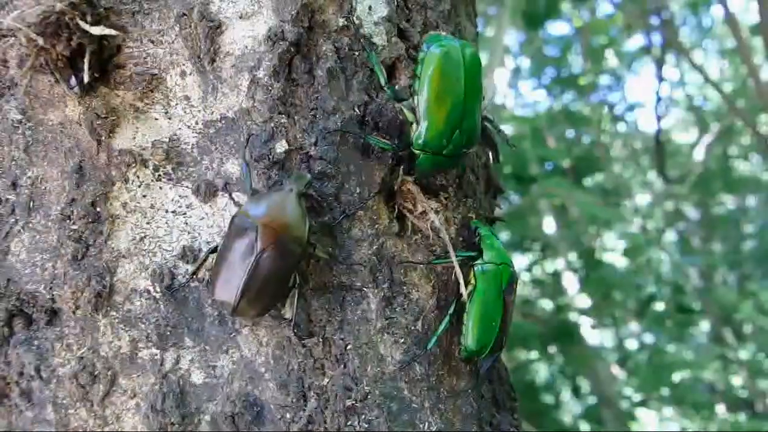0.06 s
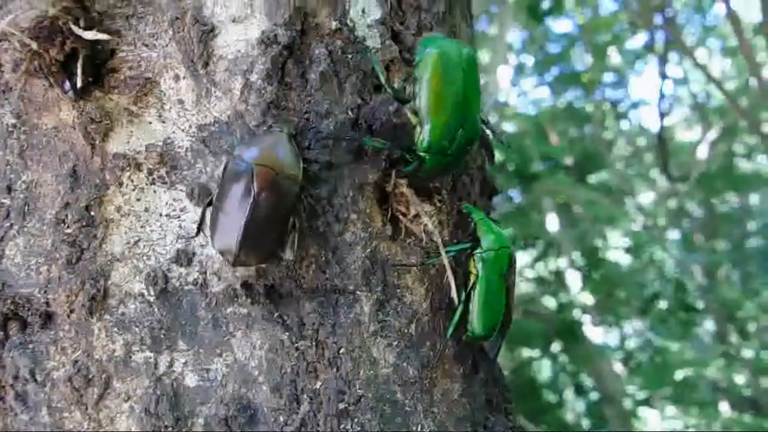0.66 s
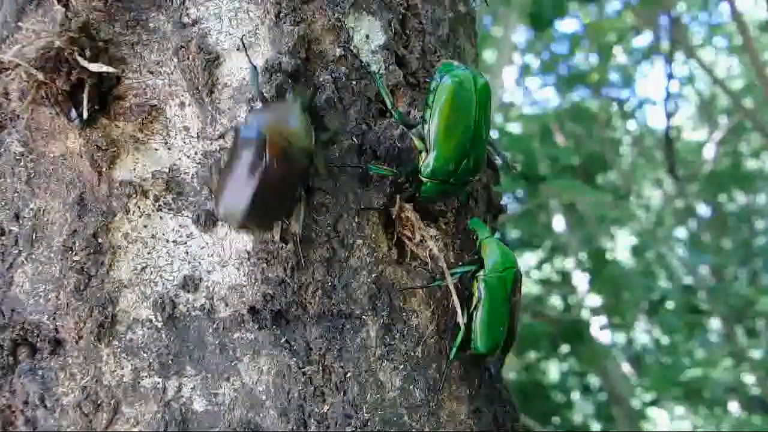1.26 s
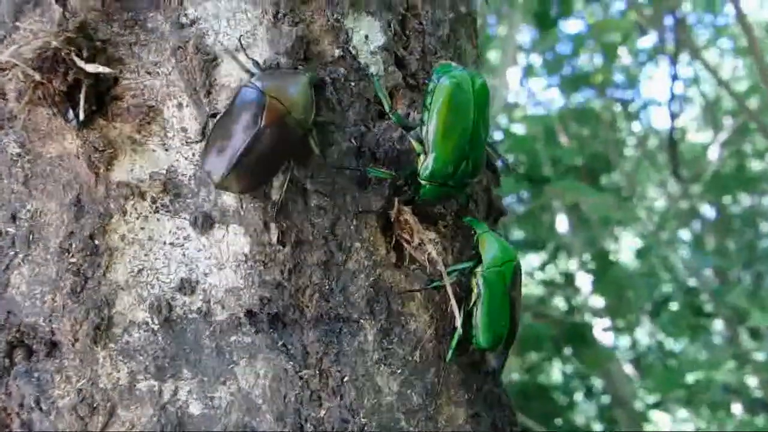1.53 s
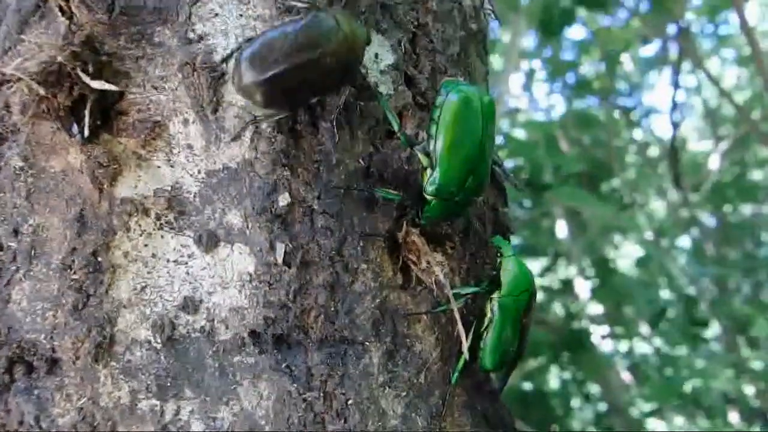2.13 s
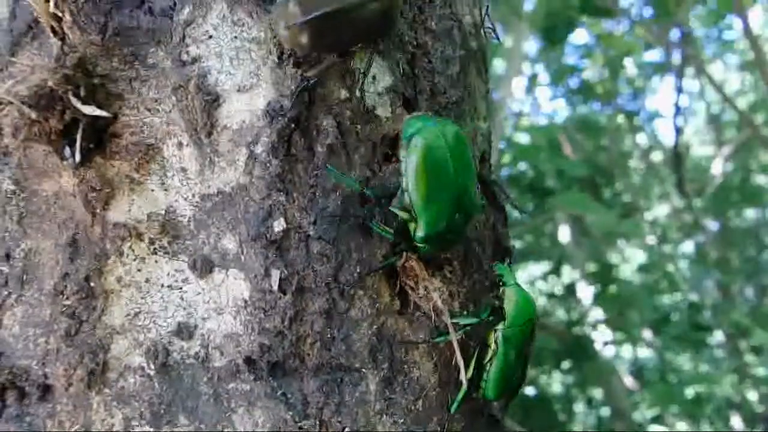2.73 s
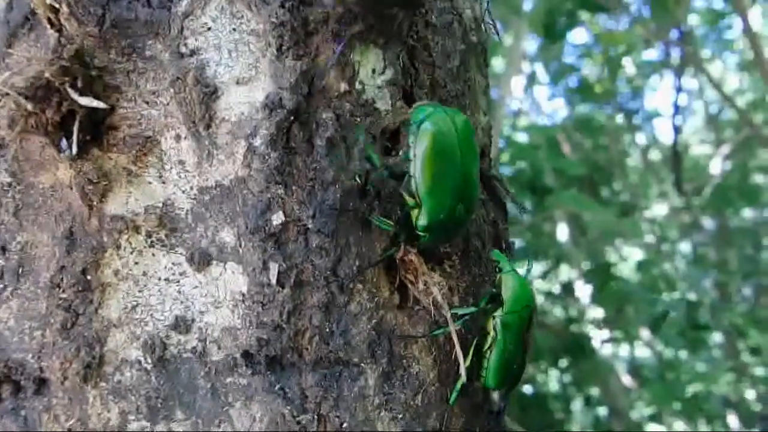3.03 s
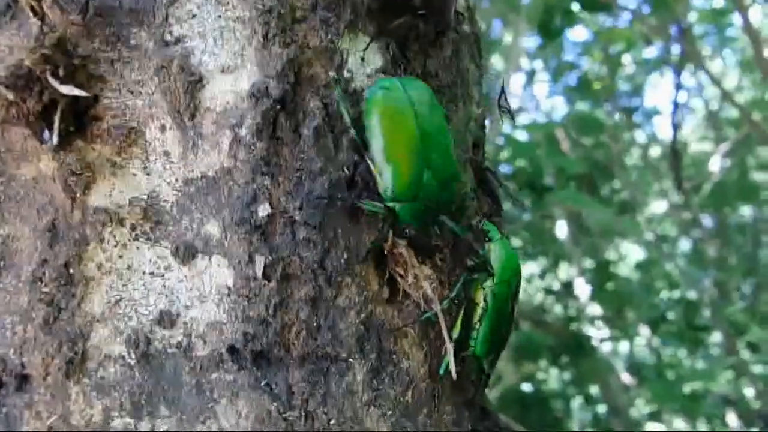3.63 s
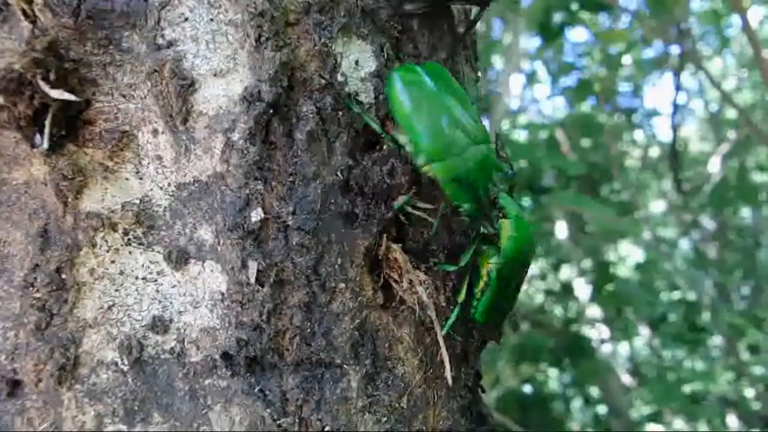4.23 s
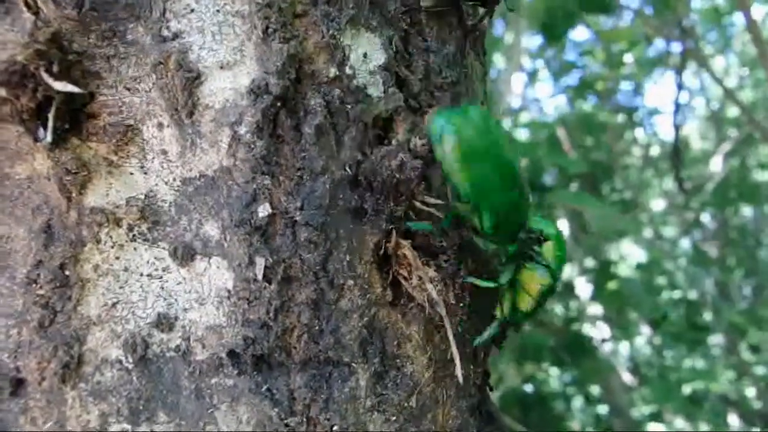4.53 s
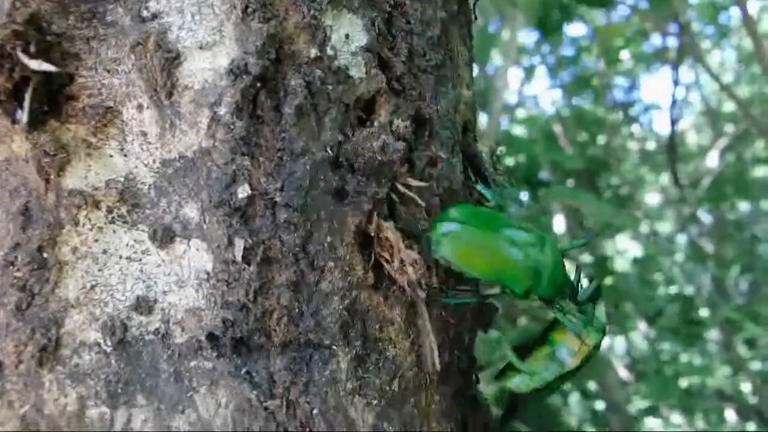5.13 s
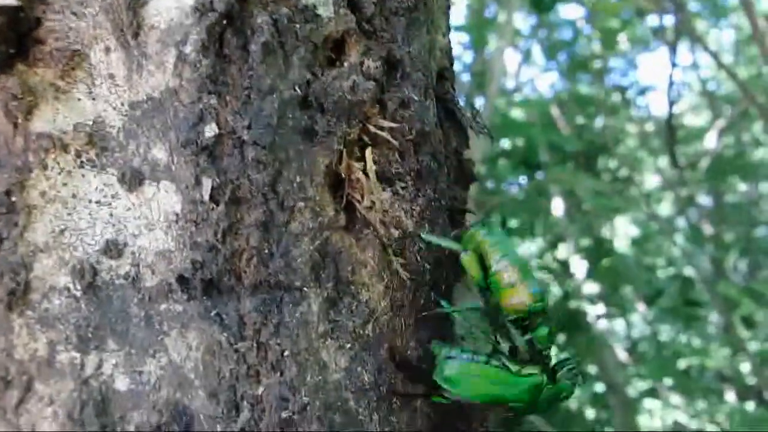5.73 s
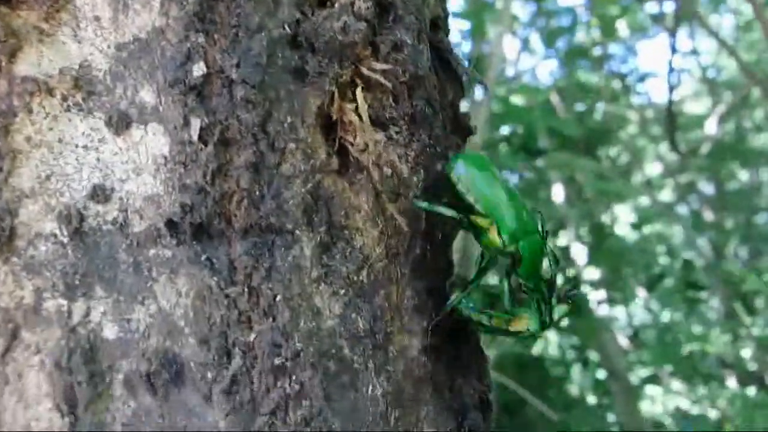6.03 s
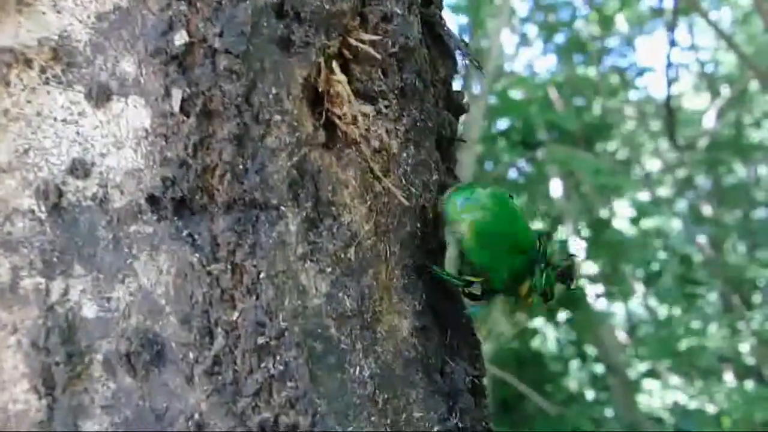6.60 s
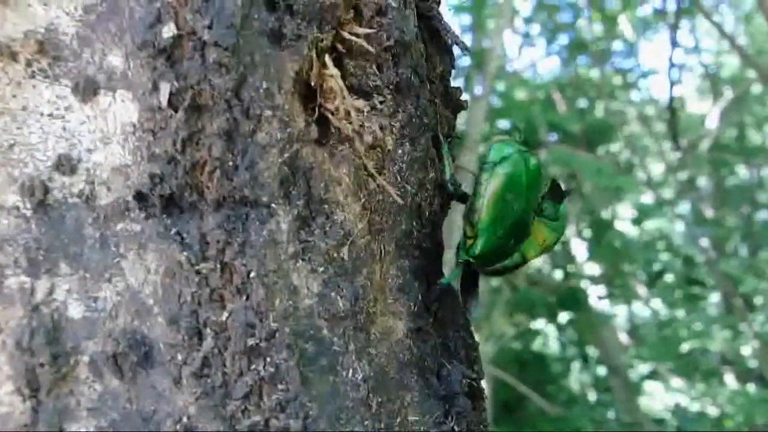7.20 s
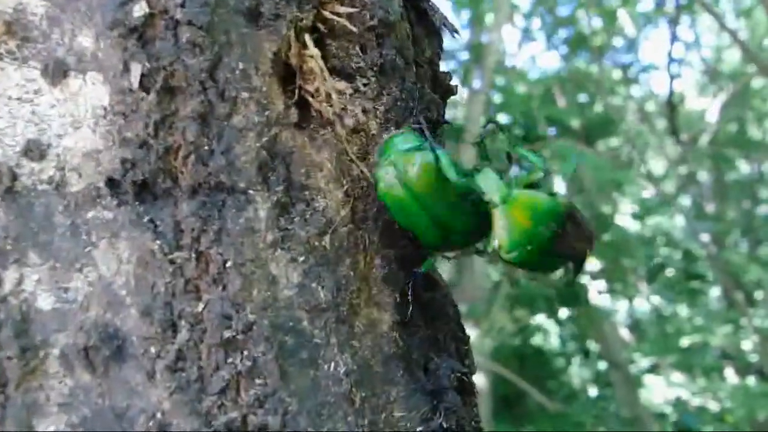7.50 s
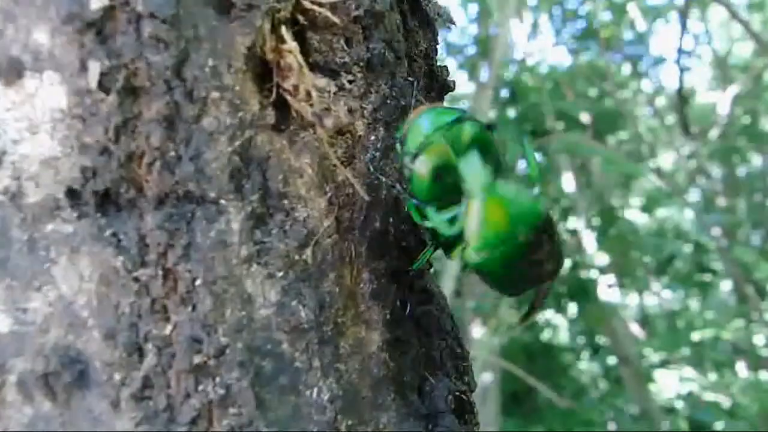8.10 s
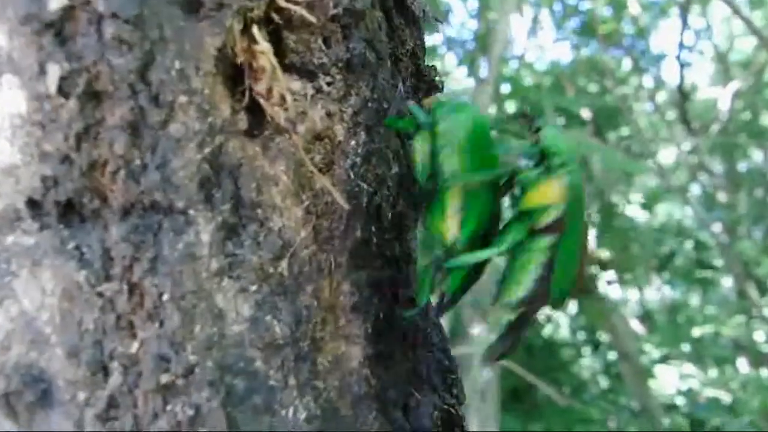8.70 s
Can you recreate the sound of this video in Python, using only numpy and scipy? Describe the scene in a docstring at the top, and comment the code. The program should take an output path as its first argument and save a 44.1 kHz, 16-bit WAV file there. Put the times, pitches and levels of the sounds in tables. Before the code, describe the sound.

Light wind tumbles over the microphone in a forest, making a low rumble with soft, uneven puffs. Close by, beetles on a tree trunk give a couple of tiny ticks, then from about halfway begin to wrestle, their claws clicking, scraping and slipping on the bark. A thin hiss and a faint, high insect chorus continue behind, and a distant bird whistles faintly three times as the scuffle starts.

```python
"""On a tree trunk in a forest, beetles climb and wrestle close to a camera.
Their claws tick as they snap free of the bark and scrape as they stick and slip over it.
Light wind tumbles over the microphone, and its swirls of air make low, soft puffs.
Behind are a thin hiss, a chorus of insects, a faint whistling bird and the camera's tiny whine."""
import sys
import numpy as np
from scipy import signal
from scipy.fft import rfft, irfft, next_fast_len
from scipy.io import wavfile
from scipy.ndimage import uniform_filter1d, map_coordinates

SR = 44100
rng = np.random.default_rng(int(sys.argv[2]) if len(sys.argv) > 2 else 0)


def generate_wav(sig):
    """Save sig (samples, or channels by samples) to the path in sys.argv[1] as 16-bit PCM at SR."""
    pcm = np.round(np.clip(np.atleast_2d(sig).T, -1, 1) * 32767).astype(np.int16)
    wavfile.write(sys.argv[1], SR, pcm)


N = 385875

# Levels in these tables are relative: the functions add their own gains.
# The loudest claw snaps and shell knocks. Each row: start in seconds, crack in dB, bark ring in dB.
CLAW_SNAPS = [(2.2214, -40, -62), (2.4664, -38, -60), (3.9804, -44, -48), (4.0651, -33, -46.5),
              (4.1916, -37, -47.5), (4.4814, -29.5, -41.5), (4.513, -33, -46), (4.5654, -42, -46),
              (4.5798, -47, -43.5), (4.6216, -47, -50), (4.6468, -48, -48), (4.8489, -34, -54),
              (4.896, -31.5, -43), (5.1533, -30, -57), (5.1647, -28.5, -54), (5.216, -21, -55),
              (5.2374, -36, -45.5), (5.4648, -36, -51), (6.346, -41, -45), (6.4364, -30, -52),
              (6.4508, -29, -41.5), (6.4988, -28.5, -61), (6.5567, -26.5, -45.5), (6.9323, -34.5, -62),
              (7.0105, -35.5, -66), (7.5314, -29, -58), (7.5567, -31, -59), (7.6237, -23, -46),
              (7.6915, -33, -41.5), (7.7149, -45, -43.5), (8.042, -46, -48.5), (8.3584, -33.5, -43),
              (8.469, -30, -54), (8.4869, -32, -35.5), (8.6927, -38, -44)]
# Legs dragged over bark. Each row: start and length in seconds, fine scratch in dB, crunch in dB.
LEG_DRAGS = [(3.98, 0.27, -68, -67), (4.416, 0.24, -58.5, -59.5), (4.858, 0.055, -51, -54.5),
             (4.99, 0.03, -53, -59), (5.477, 0.035, -59, -69), (5.693, 0.018, -54, -65),
             (5.915, 0.02, -53, -67), (5.985, 0.053, -56, -58.5), (6.14, 0.26, -59.5, -64.5),
             (6.255, 0.02, -48, -65), (6.42, 0.016, -47.5, -55), (6.487, 0.063, -52.5, -58.5),
             (6.755, 0.036, -50, -55), (7.13, 0.01, -49, -60), (7.53, 0.039, -52.5, -60),
             (7.99, 0.11, -60, -66), (8.362, 0.0089, -46, -55), (8.469, 0.024, -42, -43),
             (8.499, 0.02, -44, -42.5), (8.58, 0.15, -58, -59.5)]
# The breeze between gusts. Each row: time in seconds, rumble in dB.
BREEZE_LEVELS = [(0.3, -34), (0.9, -38.5), (1.3, -35.5), (2.1, -34.5), (2.8, -36), (3.5, -37.5), (4.0, -38),
                 (4.5, -42.5), (4.8, -33.5), (5.05, -45), (5.2, -39), (5.85, -36.5), (6.25, -44.5),
                 (6.6, -31), (7.0, -42.5), (7.3, -35), (8.75, -34.5)]
# Gusts. Each row: start and length in seconds, rumble in dB, flutter in dB compared with that rumble.
WIND_GUSTS = [(0.281, 0.068, -24, 2.5), (0.376, 0.074, -25.5, -9), (0.575, 0.013, -23.5, -19),
              (0.662, 0.038, -30.5, -21), (0.733, 0.046, -30, -4.5), (1.082, 0.02, -34.5, -5),
              (1.207, 0.06, -32.5, -11), (1.418, 0.04, -30, -10.5), (1.523, 0.038, -16, -8),
              (1.57, 0.062, -23.5, -19), (1.835, 0.12, -33, -10), (2.053, 0.013, -22.5, -15.5),
              (2.356, 0.005, -20, -9), (2.404, 0.068, -26.5, -11.5), (2.965, 0.0098, -33, -5),
              (3.15, 0.66, -42.5, -6), (3.379, 0.033, -25.5, -15), (4.033, 0.058, -33.5, -16.5),
              (4.611, 0.051, -29, -10), (4.7, 0.035, -28, -10), (4.843, 0.046, -32.5, -28),
              (5.17, 0.041, -35.5, -14), (5.424, 0.075, -29.5, -12), (5.533, 0.0075, -26, -6.5),
              (6.377, 0.057, -27, -22), (6.487, 0.03, -37.5, -25), (6.637, 0.05, -22.5, -17),
              (7.063, 0.048, -28.5, -4), (7.147, 0.11, -23.5, -10.5), (7.302, 0.045, -29.5, -15),
              (7.574, 0.09, -26, -13.5), (7.709, 0.082, -21.5, -14.5), (7.818, 0.11, -25, -24),
              (8.024, 0.076, -30.5, -23), (8.181, 0.014, -25, -13), (8.251, 0.16, -26, -8),
              (8.631, 0.047, -28, -10)]
# The strongest swirls of air. Each row: time in seconds, level in dB, pitch in Hz.
AIR_SWIRLS = [(0.313, -13, 264), (0.321, -13.5, 450), (0.331, -16, 597), (0.345, -10.5, 206),
              (0.358, -17, 400), (0.392, -8.5, 190), (0.704, -16.5, 138), (0.752, -14.5, 162),
              (0.977, -23.5, 112), (1.238, -20.5, 182), (1.432, -18.5, 197), (1.533, -12, 142),
              (1.546, -14, 136), (2.357, -10, 255), (2.362, -8, 255), (2.404, -12, 240),
              (2.586, -21.5, 160), (2.968, -25, 243), (4.733, -14.5, 192), (5.544, -14.5, 130),
              (6.389, -15.5, 151), (6.648, -13.5, 170), (6.691, -9.5, 137), (7.073, -10, 142),
              (7.155, -9.5, 194), (7.192, -8.5, 165), (7.242, -11.5, 188), (7.359, -14, 185),
              (7.673, -15, 165), (7.733, -12.5, 180), (7.792, -15, 139), (8.288, -10, 166),
              (8.319, -11, 284), (8.389, -12, 176)]
# The forest background. Each row: time in seconds, hiss in dB, insect chorus in dB.
FOREST_LEVELS = [(.3, -57.5, -65), (1.2, -55, -62.5), (4, -54, -61), (8.75, -54, -61.5)]
# Single insects. Each row: pitch in Hz, pitch waver in Hz, level in dB.
INSECT_VOICES = [(4640, 13, -8), (7130, 25, -14), (7560, 25, -17), (8053, 30, -17), (8440, 40, -6),
                 (8930, 45, -7.5), (9362, 30, -16), (9470, 30, -15), (11580, 50, -17), (13620, 70, -24)]
# The bird's whistles. Each row: start in seconds, level in dB.
BIRD_CALLS = [(4.23, -63), (4.665, -55.5), (5.055, -56)]
# The tone colour of each noise. Each row: frequency in Hz, level in dB.
CLAW_TONE = [(1500, -21), (3000, 3.5), (5000, 5.5), (7000, 5), (9000, 9.5), (11500, 4.5), (15500, 7)]
BARK_TONE = [(500, 7), (1200, -4.5), (2000, 2), (2900, 8.5), (3600, 5), (5000, -6), (8000, -31),
             (12000, -58)]
RUMBLE_TONE = [(15, -21), (30, -10.5), (55, 2.5), (90, 2), (140, -1), (200, -8.5), (280, -17), (400, -49.5),
               (700, -69), (2000, -120)]
FLUTTER_TONE = [(120, -30), (220, -2.5), (300, 3), (400, -5), (490, -10.5), (590, -19), (750, -23.5),
                (1000, -34), (1600, -43), (3000, -120)]
HISS_TONE = [(100, -36), (500, 4), (900, 0), (2000, -1), (2900, -2), (3700, -9), (5500, -8.5), (9000, -26),
             (11000, -12), (16000, -18)]
CHORUS_TONE = [(5500, -55), (6600, -6.5), (7300, -0.5), (8200, 2.5), (9300, 0), (9900, -11), (10800, -37)]
# Narrow treble bands that the camera turns down. Each row: centre in Hz, width in Hz.
CAMERA_NOTCHES = [(4050, 430), (6260, 590), (7810, 690), (10160, 580)]


def claw_ticks(claw_db=-6, bark_db=5, rise_s=0.0008, crack_s=0.009, crumble_s=0.03, crumble_db=-22):
    """A claw snaps free: a bright crack, a duller ring of the bark and a short crumbling tail."""
    claw, bark, t = np.zeros(N), np.zeros(N), np.arange(SR // 16) / SR
    decay = amp(-60 * t / crack_s) + amp(crumble_db - 60 * t / crumble_s)
    shape = (1 - np.exp(-(t / rise_s) ** 2)) * decay
    shape /= shape.max()
    for start, crack_db, ring_db in CLAW_SNAPS:
        add(claw, start, amp(crack_db + claw_db) * shape * rng.standard_normal(len(t)))
        add(bark, start, amp(ring_db + bark_db) * shape * rng.standard_normal(len(t)))
    return coloured(claw, CLAW_TONE) + coloured(bark, BARK_TONE)


def leg_scrapes(level_db=2, scuffle_start_s=3.9, slips_per_s=420, slip_decay_s=0.0015, spread_db=4.5):
    """Dragged claws stick and slip on the bark, making a dense run of tiny, uneven cracks."""
    # Once the wrestling starts, the legs also scrabble lightly between drags.
    scuffle = (np.arange(N) / SR > scuffle_start_s) * amp(3 * wobble(30))
    edges = dict(rise_s=0.004, fall_s=0.011)
    scratch_power = swells([(s, length, db) for s, length, db, _ in LEG_DRAGS], **edges)
    crunch_power = swells([(s, length, db) for s, length, _, db in LEG_DRAGS], **edges)
    slips = (rng.random(N) < slips_per_s / SR) * amp(spread_db * np.clip(rng.standard_normal(N), -2, 2))
    slip_shape = np.exp(-np.arange(SR // 50) / SR / slip_decay_s)
    grain = steadied(signal.fftconvolve(slips, slip_shape)[:N], samples=1400)
    scratch = np.sqrt(scratch_power + (scuffle * amp(-68.5)) ** 2) * noise(CLAW_TONE)
    crunch = np.sqrt(crunch_power + (scuffle * amp(-65.5)) ** 2) * noise(BARK_TONE)
    return amp(level_db) * grain * (scratch + crunch)


def wind(rumble_db=-0.5, gust_db=-1, flutter_db=-3, roll_db=1, lumps_db=6.5, gust_cut_hz=65.4):
    """Air tumbles over the microphone: big swirls rumble, small ones flutter, and gusts add to both."""
    breeze_db, = curves(BREEZE_LEVELS)
    edges = dict(rise_s=0.0051, fall_s=0.015)
    gust_power = swells([(s, length, db) for s, length, db, _ in WIND_GUSTS], **edges)
    flutter_power = swells([(s, length, db + extra) for s, length, db, extra in WIND_GUSTS], **edges)
    flutter_power += amp(breeze_db - 15.5) ** 2  # the breeze flutters a little too
    roll = amp(roll_db * wobble(22))
    lumps = amp(lumps_db * wobble(130))
    rumble = steadied(noise(RUMBLE_TONE) * roll, samples=4400)
    flutter = steadied(noise(FLUTTER_TONE) * roll * lumps, samples=1800)
    # Gusts are too short to carry the deepest rumble.
    gust = filtered(noise(RUMBLE_TONE), lambda hz: hz ** 4 / (hz ** 4 + gust_cut_hz ** 4))
    return (amp(breeze_db + rumble_db) * rumble
            + amp(gust_db) * np.sqrt(gust_power) * steadied(gust, samples=1000)
            + amp(flutter_db) * np.sqrt(flutter_power) * flutter)


def wind_puffs(width_cycles=0.33, edge_db=-12, edge_ratio=1.6, low_hz=65, high_hz=720):
    """A strong swirl is one short swing of pressure; it sheds a smaller, higher one that sharpens it."""
    puffs, t = np.zeros(N), np.arange(-SR // 25, SR // 25) / SR

    def swing(hz):
        wave = np.sin(2 * np.pi * hz * t + rng.uniform(0, 2 * np.pi))
        return wave / np.cosh(np.clip(t * hz / width_cycles, -20, 20))

    for time, db, hz in AIR_SWIRLS:
        add(puffs, time + t[0], amp(db) * (swing(hz) + amp(edge_db) * swing(hz * edge_ratio)))
    # Keep each puff soft and round, without deep rumble or a sharp edge.
    return filtered(puffs, lambda hz: hz ** 2 / (hz ** 2 + low_hz ** 2) / (1 + (hz / high_hz) ** 8))


def forest(band_db=2, waver_db=1.75):
    """An even hiss and a far insect chorus, in which single insects hold thin, wavering tones."""
    hiss_db, chorus_db = curves(FOREST_LEVELS)
    chorus = amp(band_db) * noise(CHORUS_TONE)
    for pitch_hz, waver_hz, db in INSECT_VOICES:
        hz = pitch_hz + waver_hz * (0.5 * wobble(20) + wobble(250))
        song = unit(np.sin(2 * np.pi * np.cumsum(hz) / SR))
        chorus += amp(db + waver_db * wobble(45)) * song
    return amp(hiss_db) * noise(HISS_TONE) + amp(chorus_db) * chorus


def bird(length_s=0.27, top_hz=4350, arch_hz=540, echo_db=-3, echo_decay_s=0.96):
    """Each far whistle rises and falls in a shaky arch, loudest at the top, and echoes among trees."""
    whistles, count = np.zeros(N), round(length_s * SR)
    droop = np.linspace(-1, 1, count) ** 2  # 1 at both ends, 0 in the middle
    for start, db in BIRD_CALLS:
        hz = top_hz - arch_hz * droop + 22 * wobble(140)[:count]
        level = amp(db - 4 * droop + 1.5 * wobble(60)[:count]) * np.sqrt(1 - droop)
        add(whistles, start, level * np.sin(2 * np.pi * np.cumsum(hz) / SR))
    t = np.arange(SR // 2) / SR
    trees = rng.standard_normal(len(t)) * amp(-60 * t / echo_decay_s)
    echo = signal.fftconvolve(whistles, trees / np.linalg.norm(trees))[:N]
    return whistles + amp(echo_db) * echo


def camera_whine(level_db=-81, pitch_hz=15735):
    """A thin, steady tone from the camera's electronics."""
    return amp(level_db) * np.sin(2 * np.pi * pitch_hz * np.arange(N) / SR)


def amp(db):
    """Turn decibels into a number to multiply by."""
    return 10 ** (np.asarray(db) / 20)


def unit(x):
    """Scale x to an average power of 1."""
    return x / np.sqrt(np.mean(x ** 2) + 1e-20)


def curves(rows):
    """Join timed points with straight lines, one curve for each column after the time."""
    times, *columns = np.transpose(rows)
    return [np.interp(np.arange(N) / SR, times, column) for column in columns]


def swells(rows, rise_s, fall_s):
    """The summed power of events that rise, hold and die away."""
    power, t = np.zeros(N), np.arange(-SR // 10, SR) / SR
    for start, length, db in rows:
        shape = np.exp(np.minimum(t, 0) / rise_s - np.maximum(t - length, 0) / fall_s)
        add(power, start + t[0], (amp(db) * shape) ** 2)
    return power


def wobble(rate):
    """A smooth curve through random points, rate of them each second."""
    return map_coordinates(rng.standard_normal(int(N * rate / SR) + 4), [np.arange(N) * rate / SR])


def filtered(x, response):
    """Turn each frequency of x up or down by response(hz)."""
    size = next_fast_len(N + SR // 2)
    return irfft(rfft(x, size) * response(np.fft.rfftfreq(size, 1 / SR)), size)[:N]


def coloured(x, tone):
    """Give x a tone colour; white noise keeps its power."""
    points_hz, db = np.transpose(tone)
    return filtered(x, lambda hz: unit(amp(np.interp(np.log(hz + 1), np.log(points_hz), db))))


def noise(tone):
    """Noise with a tone colour and an average power of 1."""
    return unit(coloured(rng.standard_normal(N), tone))


def steadied(x, samples):
    """Even out loudness changes slower than this many samples."""
    power = uniform_filter1d(uniform_filter1d(x * x, samples), samples)
    return x / np.sqrt(np.abs(power) + 1e-9)


def add(track, start_s, sound):
    """Mix a sound into a track at a given time."""
    part = track[max(round(start_s * SR), 0):][:len(sound)]
    part += sound[:len(part)]


def scene():
    """Wind, beetles and background meet at one microphone."""
    air = wind() + wind_puffs()
    beetles = claw_ticks() + leg_scrapes()
    return (air + beetles + forest() + bird() + camera_whine())[None]


def record(dry, fade_end_s=0.305, fade_db_per_s=410, notch_depth=0.8, top_hz=15950):
    """The sound fades in; the camera dips four narrow treble bands and keeps nothing above top_hz."""
    fade = amp(np.clip((np.arange(N) / SR - fade_end_s) * fade_db_per_s, -52, 0))

    def camera(hz):
        dips = [1 - notch_depth * 1j * hz * width / (centre ** 2 - hz ** 2 + 1j * hz * width)
                for centre, width in CAMERA_NOTCHES]
        return np.prod(dips, axis=0) * (hz < top_hz)

    return filtered(fade * dry[0], camera)[None]


dry = scene()
out = record(dry)
generate_wav(out)
```